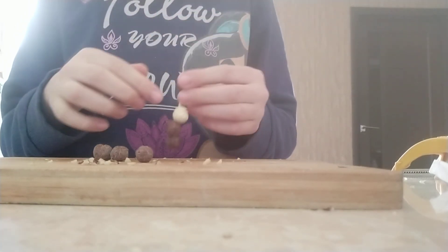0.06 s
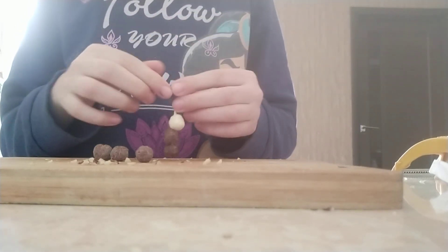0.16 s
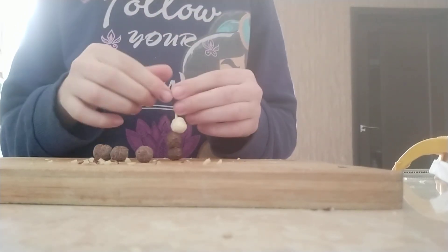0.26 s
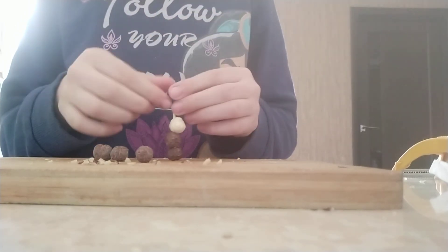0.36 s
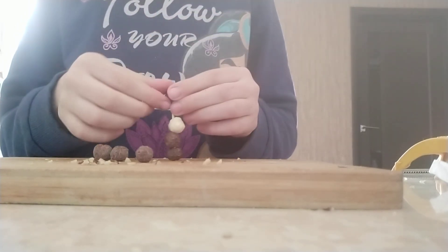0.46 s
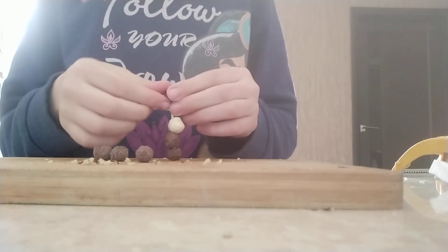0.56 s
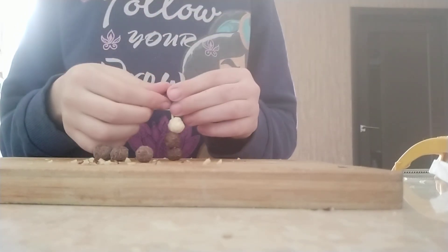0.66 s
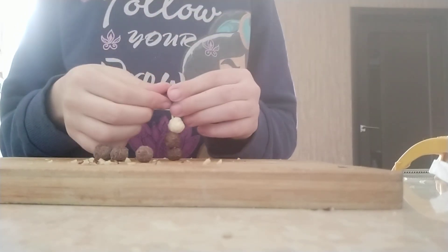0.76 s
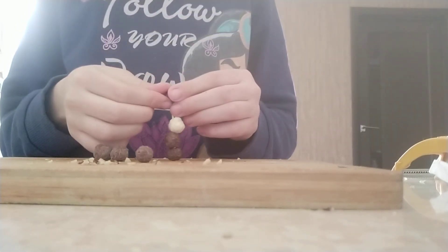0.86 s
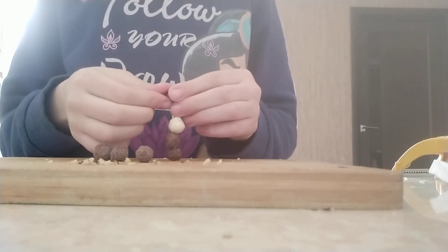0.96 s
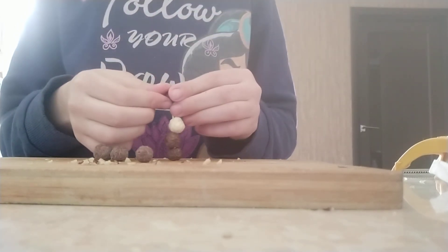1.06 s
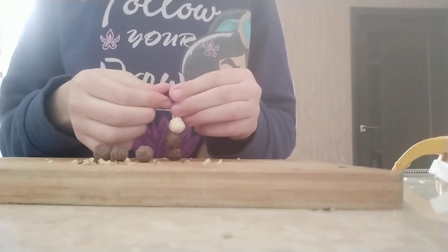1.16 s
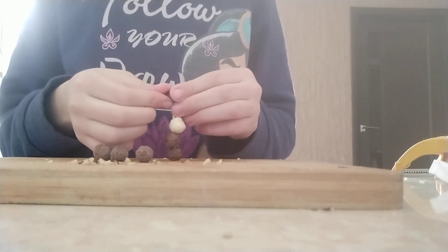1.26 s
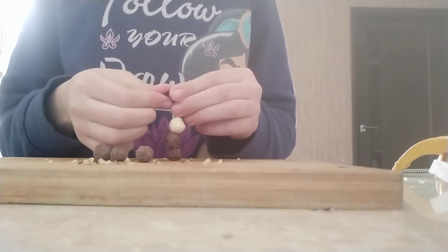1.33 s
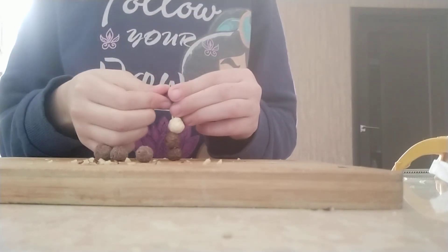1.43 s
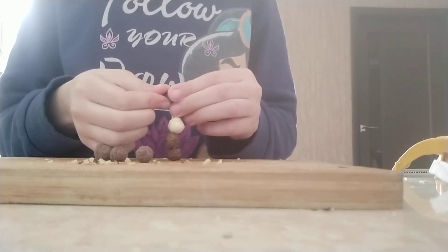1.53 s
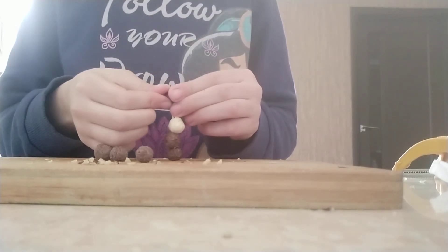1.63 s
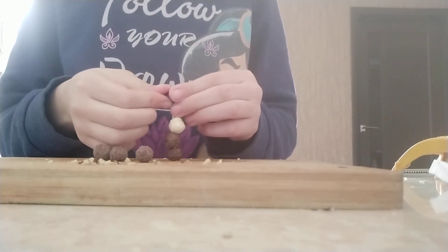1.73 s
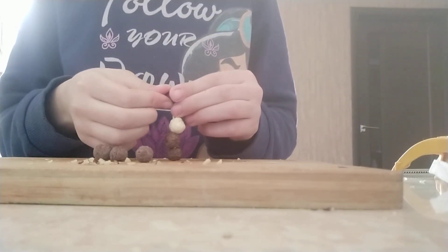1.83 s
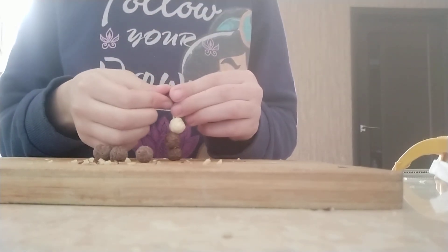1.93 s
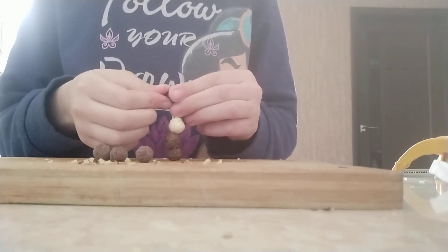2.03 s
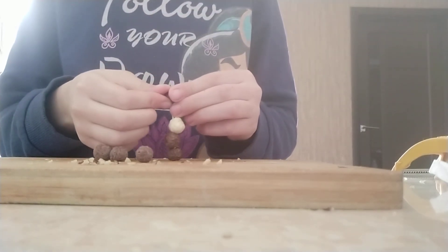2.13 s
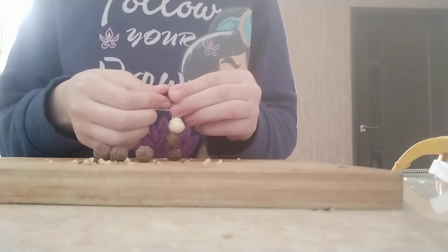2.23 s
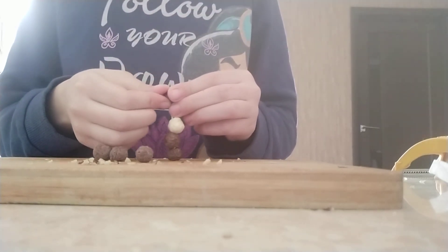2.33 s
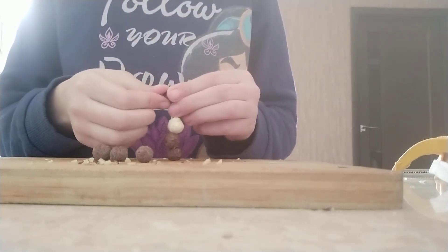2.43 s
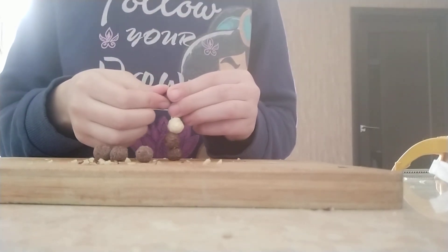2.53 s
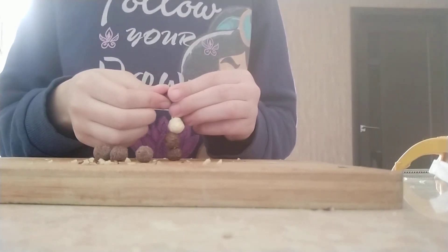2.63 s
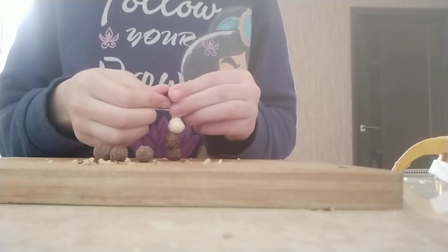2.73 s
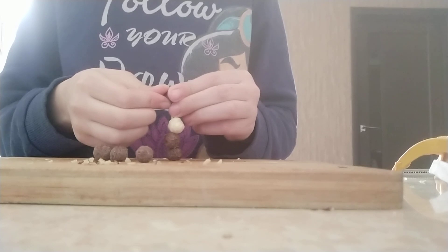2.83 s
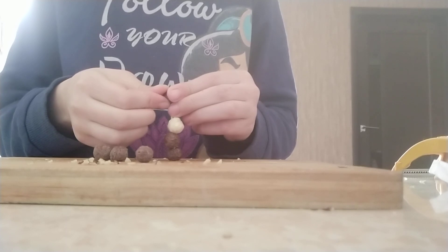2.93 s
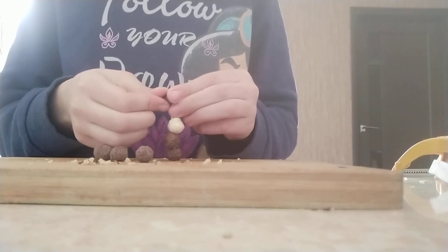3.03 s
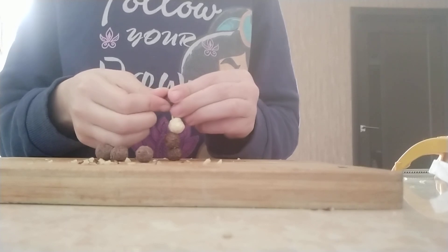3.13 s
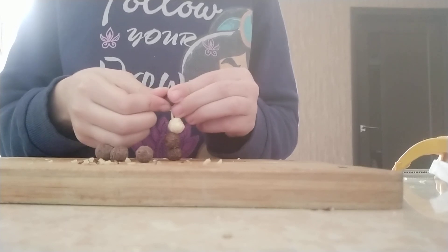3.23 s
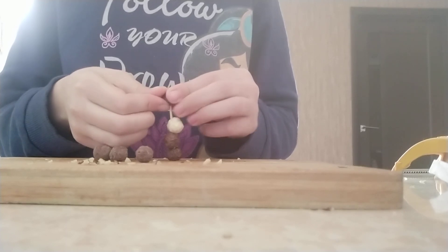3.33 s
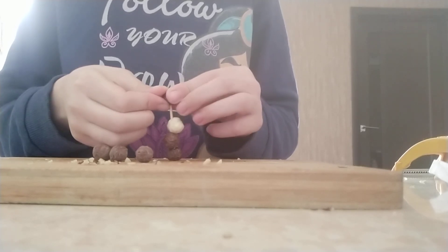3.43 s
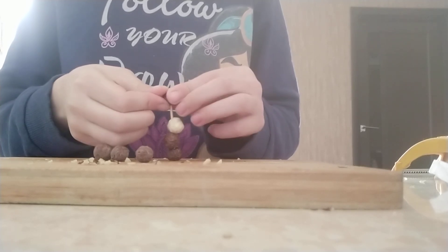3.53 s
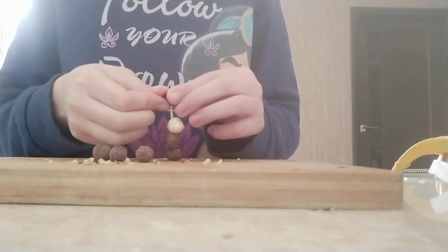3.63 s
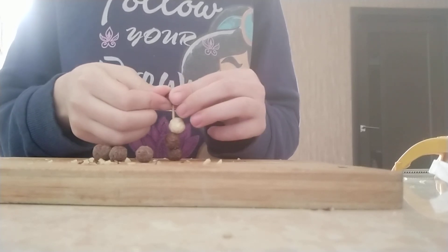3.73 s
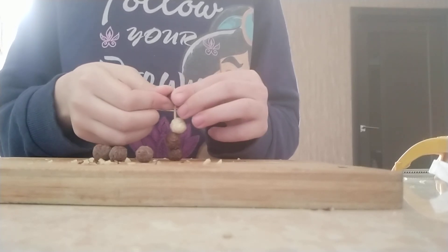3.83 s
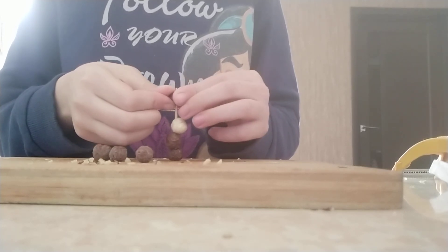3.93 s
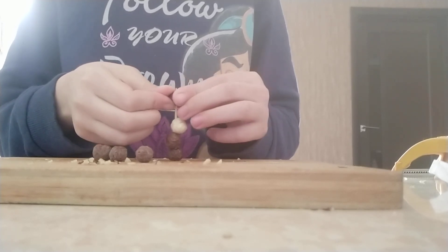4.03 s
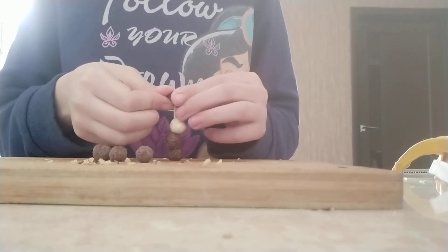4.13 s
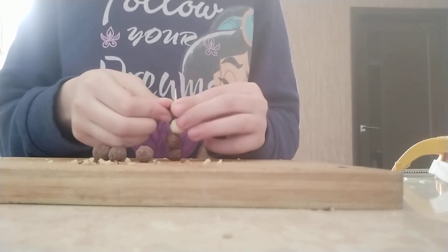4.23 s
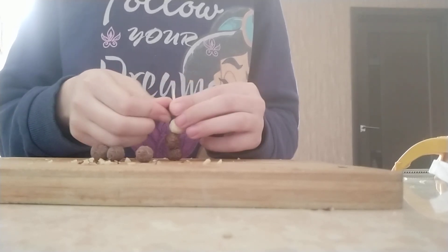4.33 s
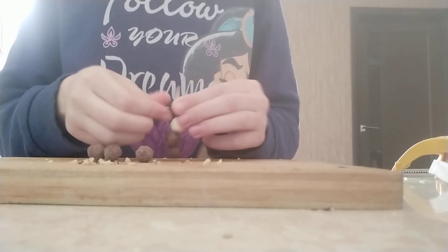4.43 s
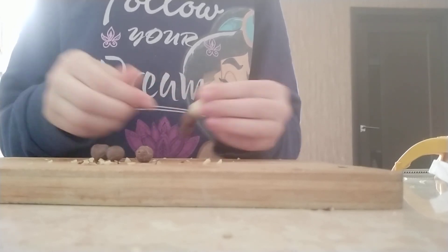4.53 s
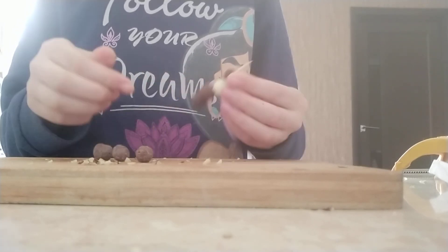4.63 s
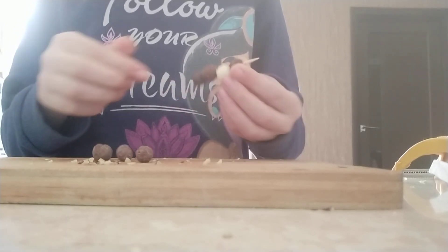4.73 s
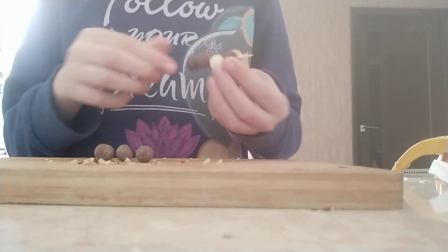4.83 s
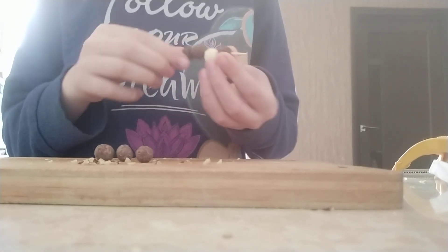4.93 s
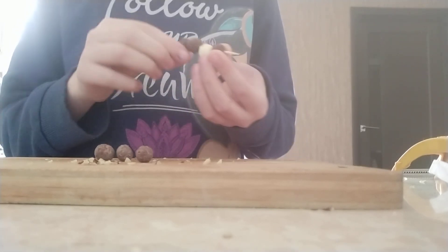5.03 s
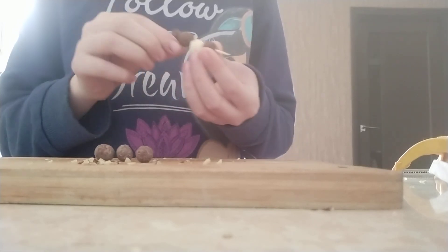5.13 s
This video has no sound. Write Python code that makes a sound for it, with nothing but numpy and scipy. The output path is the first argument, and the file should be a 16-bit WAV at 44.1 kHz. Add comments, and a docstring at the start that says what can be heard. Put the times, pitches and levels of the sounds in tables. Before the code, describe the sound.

A fridge motor hums low and steady throughout in a quiet kitchen, with a soft rumble and light microphone hiss. From about 1 to 3 seconds, fingers pressing a cereal ball onto a wooden toothpick make a very faint, thin, high hiss. At about 2.9 seconds the ball breaks with one short, brittle crack, almost a click. At about 4.1 seconds a second ball cracks, slightly longer and brighter. Right after, at 4.2 seconds, a hand gives a light, quick knock on a wooden board, a little left of centre. Around 5 seconds come three tiny, barely audible high squeaks. The cracks and the knock are close to the stereo microphones and stand out clearly over the hum, each with a brief echo from the bare room.

```python
"""Cereal cracking in a quiet kitchen

Near a spaced pair of microphones, two brittle cereal balls crack on a wooden pick, one after the other:
cell walls snap in a burst that rings ball, pick and board. The fingers press with a faint hiss, a hand
knocks the board after the second crack, and the bare room throws cracks and knocks back. Faint squeaks
come near the end. Behind it all a fridge motor hums over its own low rumble and microphone hiss."""
import sys
import numpy as np
from scipy import signal
from scipy.io import wavfile
from scipy.ndimage import uniform_filter1d

SR = 44100
rng = np.random.default_rng(int(sys.argv[2]) if len(sys.argv) > 2 else 0)


def persist_wave(psi):
    """Save psi, clipped to +-1, as 16-bit WAV."""
    counts = np.round(np.clip(psi, -1, 1) * 32767).astype(np.int16)
    wavfile.write(sys.argv[1], SR, np.atleast_2d(counts).T)


N = 228077

# The two balls breaking. Each row: start in seconds, length in seconds, share of the length at which
# the force peaks, force in dB, then brightness in dB early on, at the end and added toward the walls.
CRUNCHES = [(2.8997, 0.02, 0.63, -25.5, -2, -12.5, -4.5), (4.0578, 0.028, 0.22, -24.5, 1, -3, 0)]
# Modes of ball, pick and board; each ball grips elsewhere and stirs them by its own amount. Each row:
# pitch in Hz, width in Hz, share of the brightness, left lead in turns, then for each ball a pair of
# level in dB and left over right in dB.
CRUNCH_MODES = [(125, 7.6, 1.3, 0.012, (-32, 0), (-20, 0)), (207, 57, 0.15, 0.041, (-13.5, 3.5),
                (-14.5, 3.3)), (327, 55, 1.16, .13, (-6.5, 3), (-4.5, -1.8)), (387, 43, 0, 0.16, (-8, 2),
                (-34, -2)), (508, 95, 0, 0.27, (-10.5, -1), (-21, -1)), (620, 150, 0.03, 0.12, (-9.5, 4),
                (-19, 2)), (747, 90, 0.17, -0.0052, (-9.5, -5), (-13, -3)), (833, 54, 0.022, 0.13, (-19, 3),
                (-5.5, 0)), (954, 9, 0.35, -0.014, (-31, 3), (-16, 3)),
                (1017, 68, 0.023, -0.025, (-7.5, 4.5), (-1.1, 4.3)), (1130, 99, 0.21, -0.022, (-4.5, 2.9),
                (-7, 4)), (1388, 52, 0.33, 0.37, (-7.5, 8.4), (-6, 5.4)), (1718, 55, 1.3, 0.16, (-13, -3),
                (-9, -2)), (2150, 73, 0.082, 0.18, (-19.5, -2), (-12.5, -2)),
                (2345, 190, 0.56, -0.12, (-24, 5), (-12.5, 3.5)), (2716, 143, 0.96, -0.023, (-6, -2),
                (-4.5, -1.1)), (3510, 150, 0.82, -0.096, (-20, -1), (-11.5, -4)),
                (4030, 1100, 0.72, -0.016, (-18, 0), (-10, 2)), (4840, 130, 1.5, -.1, (-10.5, 4),
                (-13.5, 3)), (5390, 420, 0.86, 0.39, (-11.5, 3), (-7.5, 4)),
                (7040, 2300, 0.41, -.35, (-14, 1), (-11.5, 3)), (12400, 3700, 0.91, -0.24, (-15, -1),
                (-6, 0)), (15300, 840, 1, 0, (-14, -2), (-17, -2))]
# The largest snaps, sounded if they fall within a crunch. Each row: time in seconds, size over the
# dense burst in dB, brightness in dB.
BIG_SNAPS = [(2.9008, 27, -15), (2.9020, 17, -1), (2.9057, 17, -8), (2.9090, 15, -13), (2.9130, 14, -3),
             (2.9168, 22, -10), (4.0577, 26, -6), (4.0612, 17.5, 5), (4.0640, 13.5, 1), (4.0668, 20, -3),
             (4.0703, 21.5, -1), (4.075, 20, -8), (4.0790, 11, 1), (4.0833, 16, 1), (4.0885, 13, -1)]
# The hand on the board. Each row: start in seconds, level in dB, contact time in seconds.
KNOCKS = [(4.2068, -22, .001), (4.2108, -17.5, .002), (4.2163, -33, .0017), (4.2215, -36, .0018)]
# Modes of the knocked board. Each row: pitch in Hz, level in dB, seconds to fall 60 dB.
BOARD_MODES = [(124.4, -6.5, 0.16), (349, 0.5, 0.041), (400, -11, 0.11), (540, 2.5, 0.022),
               (760, -4, 0.027), (1000, -2, 0.028), (1980, 3, 0.012)]
# Faint tones. Each row: start in seconds, length in seconds, first and last pitch in Hz, level in dB.
SQUEAKS = [(5.025, 0.056, 1880, 1710, -63.5), (5.105, .03, 2180, 2170, -61.5),
           (5.148, 0.035, 2110, 2230, -63)]
# The fridge's harmonics; standing waves make them differ at each microphone. Each row: multiple of
# MOTOR_HZ, left level in dB, right level in dB, left lead in turns.
MOTOR_HARMONICS = [(2, -84, -85, 0), (3, -55, -54, .02), (4, -69, -75, -.09), (5, -66, -60, -.03),
                   (6, -66, -66, .34), (7, -78, -77, .06), (8, -59, -72, .22), (9, -66, -67, -.06),
                   (10, -76, -73, .06), (11, -79, -82, -.33), (12, -71, -75, -.07), (13, -63, -67, .21),
                   (14, -67, -67, .37), (15, -68, -73, .01), (16, -70, -75, -.07), (17, -71, -85, .1),
                   (18, -79, -74, -.04), (19, -72, -71, -.48), (20, -76, -78, -.21), (21, -79, -93, .06),
                   (22, -84, -86, .39), (23, -74, -76, .43), (24, -72, -75, .19), (25, -83, -81, .39),
                   (26, -86, -84, .11), (31, -83, -87, -.38), (55, -83, -92, -.11)]
# Rumble of motor and room, microphone hiss above it. Each row: frequency in Hz, level in dB per Hz.
FLOOR_SPECTRUM = [(20, -128), (40, -124), (62, -115), (100, -106), (120, -96.5), (148, -100), (175, -82),
                  (235, -79.5), (275, -83), (320, -74.5), (365, -81.5), (440, -90), (520, -83.5),
                  (620, -91.5), (750, -92), (795, -87.5), (850, -90.5), (1100, -95.5), (1300, -98.5),
                  (2200, -100.5), (5000, -102.5), (16000, -102)]
# How alike that noise is at the two microphones. Each row: frequency in Hz, likeness from 0 to 1.
FLOOR_LIKENESS = [(60, 1), (150, 0.8), (290, 0.84), (640, 0.21), (1400, 0.11), (15000, 0)]
# The side that noise leans to. Each row: frequency in Hz, left over right in dB.
FLOOR_LEAN = [(100, -0.5), (260, 1), (430, 0.5), (550, 1.5), (630, -10), (700, 3), (900, 0), (2400, 0),
              (8000, -1), (15000, 0)]
# How long the kitchen rings. Each row: frequency in Hz, seconds to fall 60 dB.
ROOM_DECAY = [(150, 0.24), (500, 0.41), (1000, 0.42), (1400, 0.46), (3700, 0.47), (6000, 0.28),
              (10000, 0.24)]
# What the walls give back. Each row: frequency in Hz, relative level in dB.
ROOM_COLOUR = [(300, 3), (600, -3), (960, -2), (1100, -5), (1900, -3.5), (2800, -7), (4400, -2), (6000, -5),
               (8000, -5), (15000, -2)]

BITE_S, BITE_DB, SAG_DB, LET_GO_S, LET_GO_DB = 0.0011, -2.5, -8, .002, -9.5  # force on the ball
OPEN_S, CLOSED_DB = 0.003, -4  # the brightness comes in this late, from this far down
SNAPS_PER_S, GRIT = 1500, 0.88  # small snaps: rate, and size against the crumbling between them
ALIKE_HZ = 2050  # well above this, a mode differs between the microphones
SPREAD_HZ = 1500  # heard from all sides by the walls, a mode is twice as wide here, and wider above
MOTOR_HZ = 60.168
LEAN = np.array([[.5], [-.5]])  # splits a left-over-right level between the microphones


def crunch(ball, start, length, peak_share, force_db, early_db, late_db, walls_db):
    """Cell walls snap in a dense burst and ring the modes: one pair direct, one toward the walls."""
    t, end = np.arange(SR // 5) / SR, length + LET_GO_S
    # the force bites, swells to a peak, sags and lets go
    shape_db = np.interp(t, [0, BITE_S, peak_share * length, length, end],
                         [LET_GO_DB, BITE_DB, 0, SAG_DB, LET_GO_DB])
    force = gain_of(force_db + shape_db) * (t <= end)
    bright_db = np.interp(t, [0, OPEN_S, length], [early_db + CLOSED_DB, early_db, late_db])
    snapped = rng.random(len(t)) < SNAPS_PER_S / SR
    grit = 1 + GRIT * snapped * np.sqrt(SR / SNAPS_PER_S)
    out = np.zeros((2, 2, len(t)))
    for hz, width, share, lead, *balls in CRUNCH_MODES:
        db, lean_db = balls[ball]
        shared, own = rng.standard_normal(len(t)), rng.standard_normal((2, len(t)))
        alike = np.clip(ALIKE_HZ / hz, .3, .9)  # long waves reach both microphones alike
        snaps = (alike * shared + np.sqrt(1 - alike ** 2) * own) * grit
        for s, size_db, snap_bright_db in BIG_SNAPS:
            if 0 <= s - start < end:
                snaps[:, round((s - start) * SR)] += gain_of(size_db + share * snap_bright_db)
        drive = force * gain_of(share * bright_db)
        direct = resonate(snaps * drive, hz, width, lead * np.array([[1], [0]]))
        direct = resonate(direct, hz, 5.2 * width)  # again, for deep valleys between modes
        to_walls = resonate(snaps * drive, hz, (1 + hz / SPREAD_HZ) * width)
        rings = np.array([direct, to_walls])
        # the mode takes the work done
        rings *= np.linalg.norm(drive) / np.linalg.norm(rings, axis=2, keepdims=True)
        rings[1] *= gain_of(share * walls_db)
        out += gain_of(db + LEAN * lean_db) * rings
    return out


def board_knocks():
    """Rounded pushes of the hand set the board ringing briefly, left of centre."""
    t, out = np.arange(4000) / SR, np.zeros(N)
    ring = sum(gain_of(db - 60 * t / t60) * np.sin(2 * np.pi * hz * t) for hz, db, t60 in BOARD_MODES)
    for s, db, contact in KNOCKS:
        push = np.sin(np.pi * np.minimum(t / contact, 1)) ** 2
        knock = np.convolve(np.diff(push[:200], 2), ring)
        add(out, s, gain_of(db) * knock / abs(knock).max())
    return np.array([out, np.roll(out, 12)]) * gain_of(LEAN * 3.5)  # left: 12 samples early, 3.5 dB up


def finger_rub(hz=8900, width=2000):
    """A thin band of hiss that swells, holds and fades as the fingers press."""
    level_db = np.interp(np.arange(N) / SR, [0.76, 1.16, 2.8, 3.1], [-96, -72, -72, -96])
    band = resonate(rng.standard_normal((2, N)), hz, width)
    return gain_of(level_db) * unit_rms(resonate(band, hz, width))


def squeaks():
    """Short gliding tones, made fuzzy by a wandering phase."""
    out = np.zeros((2, N))
    for s, length, start_hz, end_hz, db in SQUEAKS:
        t = np.arange(0, length, 1 / SR)
        glide_hz = np.linspace(start_hz, end_hz, len(t))
        phase = np.cumsum(2 * np.pi * glide_hz / SR + 0.044 * rng.standard_normal((2, len(t))), 1)
        add(out, s, np.sqrt(2) * gain_of(db) * np.sin(phase) * np.hanning(len(t)))
    return out


def room_echo(x):
    """The bare walls: sparse reflections of random sign, each band dying at its own speed."""
    taps = np.zeros((2, SR))
    arrivals = np.arange(400, SR - 20, 20) + rng.integers(0, 20, (2, (SR - 401) // 20))
    np.put_along_axis(taps, arrivals, rng.choice([-1., 1.], arrivals.shape), 1)
    hz, t, spectra = signal.stft(taps, SR, nperseg=256)
    tail_db = curve_at(ROOM_COLOUR, hz) - 60 * t / curve_at(ROOM_DECAY, hz)
    tail = signal.istft(spectra * gain_of(tail_db), SR, nperseg=256)[1]
    return signal.fftconvolve(x, tail / np.linalg.norm(tail[0]), axes=1)[:, :N]


def fridge_hum():
    """Steady multiples of the motor's turn; some reach the microphones in step, some opposed."""
    t, out = np.arange(N) / SR, np.zeros((2, N))
    faint_harmonics = [(k, *rng.normal(-91, 3, 2), rng.random())  # chance levels in dB, chance lead
                       for k in (27, 28, 29, 30, *range(32, 42))]
    for k, left_db, right_db, lead in MOTOR_HARMONICS + faint_harmonics:
        turns = k * MOTOR_HZ * t + rng.random()
        tone = np.sin(2 * np.pi * np.array([turns + lead, turns]))
        out += np.sqrt(2) * gain_of([[left_db], [right_db]]) * tone
    return out


def rumble_and_hiss():
    """Motor and room rumble with microphone hiss, drifting slightly; only the bass is alike in both."""
    frames, hz = N // 512 + 5, np.fft.rfftfreq(2048, 1 / SR)
    left_re, left_im, own_re, own_im, drift = rng.standard_normal((frames, 1025, 5)).T
    drift_db = 1.6 * unit_rms(uniform_filter1d(uniform_filter1d(drift, 12, 0), 6, 1))
    alike = curve_at(FLOOR_LIKENESS, hz)
    left = left_re + 1j * left_im
    right = alike * left + np.sqrt(1 - alike ** 2) * (own_re + 1j * own_im)
    level_db = curve_at(FLOOR_SPECTRUM, hz) + LEAN[..., None] * curve_at(FLOOR_LEAN, hz) + drift_db
    spectra = np.array([left, right]) * gain_of(level_db)
    spectra *= np.sqrt(3 * SR / 4096)  # from power per Hz to power per bin
    return signal.istft(spectra, nperseg=2048, noverlap=1536)[1][:, :N]


def resonate(x, hz, width, lead=0):
    """A resonance that gives white input back at its own power; lead shifts its ringing, in turns."""
    pole = np.exp((2j * hz - width) * np.pi / SR)
    ringing = signal.lfilter([np.sqrt(2 * (1 - abs(pole) ** 2))], [1, -pole], x)
    return (ringing * np.exp(2j * np.pi * lead)).real


def gain_of(db):
    return 10 ** (np.asarray(db) / 20)


def unit_rms(x):
    return x / np.sqrt(np.mean(x ** 2) + 1e-20)


def curve_at(points, hz):
    """A table's values along a log frequency axis, as a column."""
    point_hz, value = np.transpose(points)
    return np.interp(np.log(hz + 1), np.log(point_hz + 1), value)[:, None]


def add(mix, start_s, sound):
    part = mix[..., round(start_s * SR):][..., :sound.shape[-1]]
    part += sound[..., :part.shape[-1]]


def scene():
    """Near sounds and their echoes over the steady kitchen."""
    knocks = board_knocks()
    near = np.array([knocks, knocks])  # toward the microphones, toward the walls
    for ball, row in enumerate(CRUNCHES):
        add(near, row[0], crunch(ball, *row))
    low_cut = signal.butter(2, 153, "high", fs=SR, output="sos")  # small things radiate no deep bass
    direct, to_walls = signal.sosfilt(low_cut, near)
    echo = gain_of(-12.5) * room_echo(to_walls)
    return direct + echo + squeaks() + fridge_hum() + rumble_and_hiss() + finger_rub()


def record(dry):
    """Both channels are cut off steeply at the top of the treble."""
    low_pass = signal.firwin(511, cutoff=15850, window=("kaiser", 9), fs=SR)
    return signal.oaconvolve(dry, low_pass[None], "same")


dry = scene()
out = record(dry)
persist_wave(out)
```